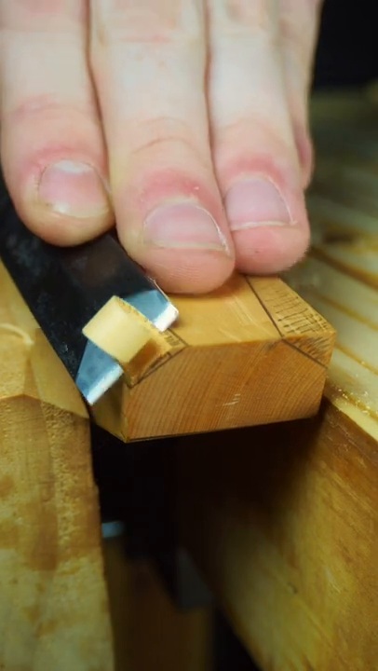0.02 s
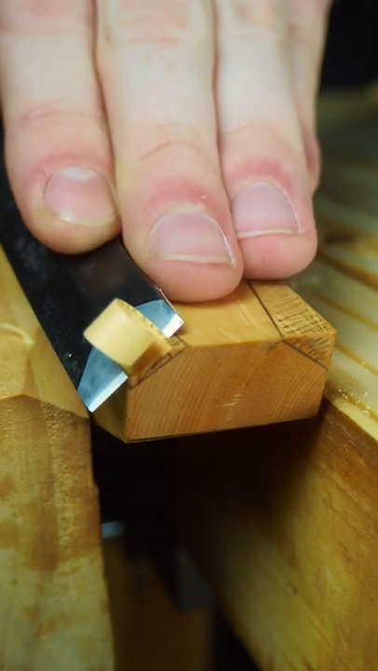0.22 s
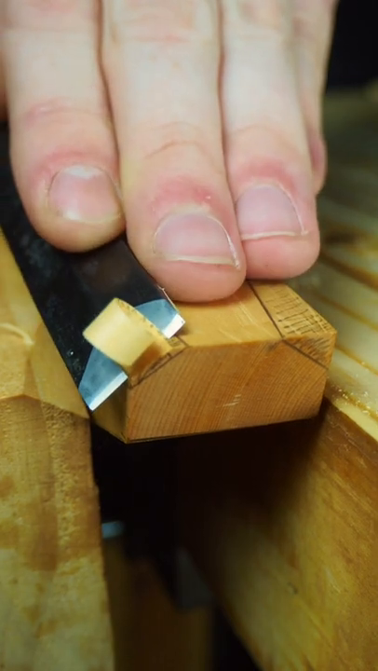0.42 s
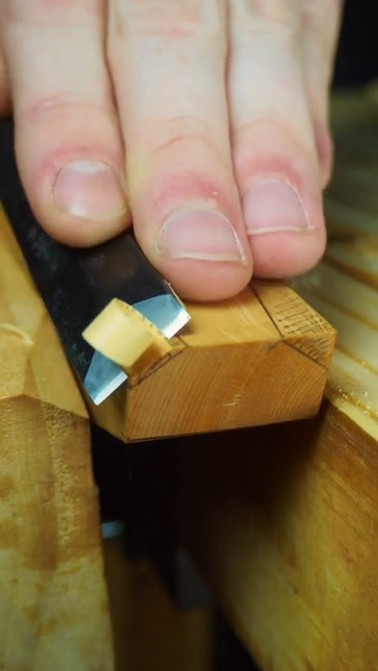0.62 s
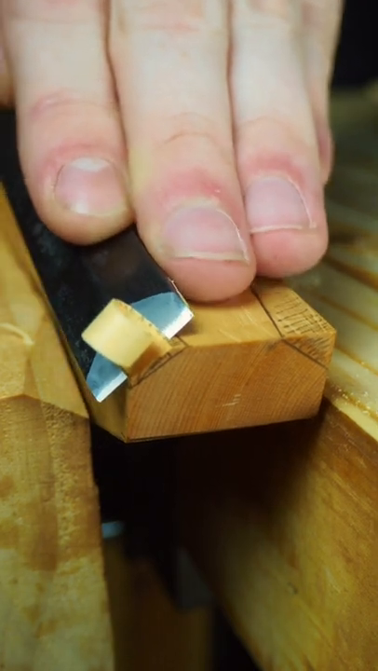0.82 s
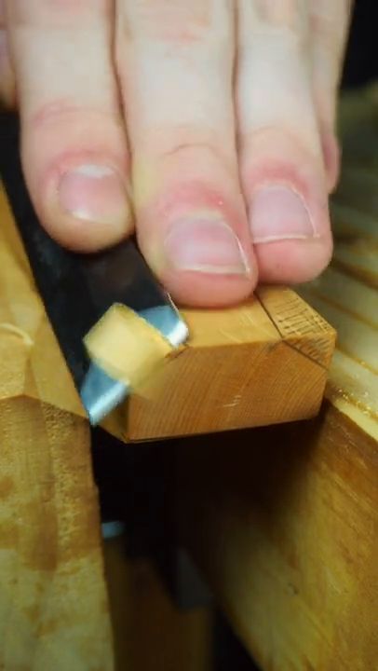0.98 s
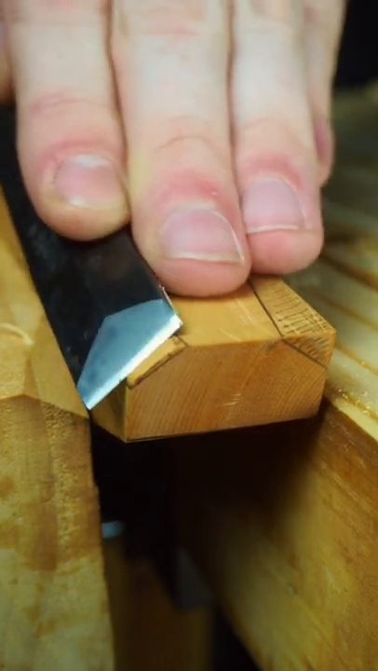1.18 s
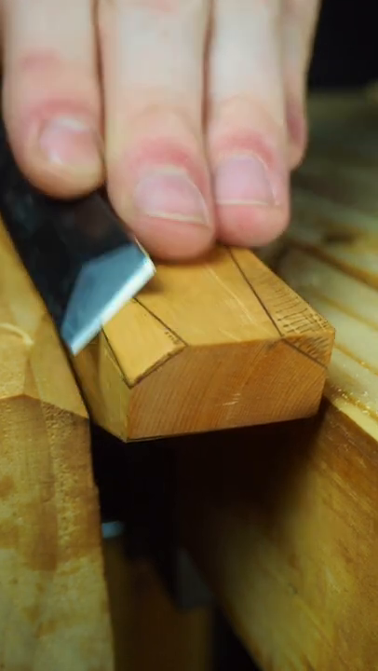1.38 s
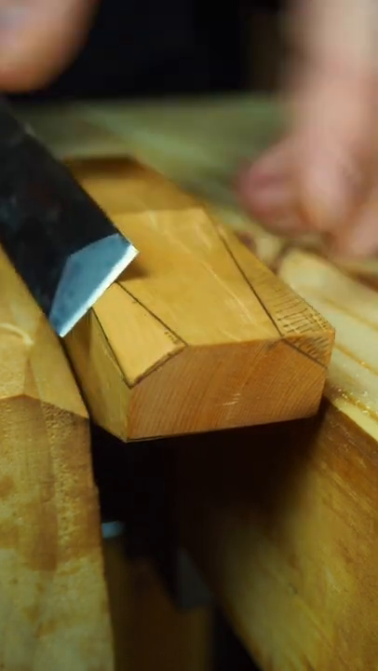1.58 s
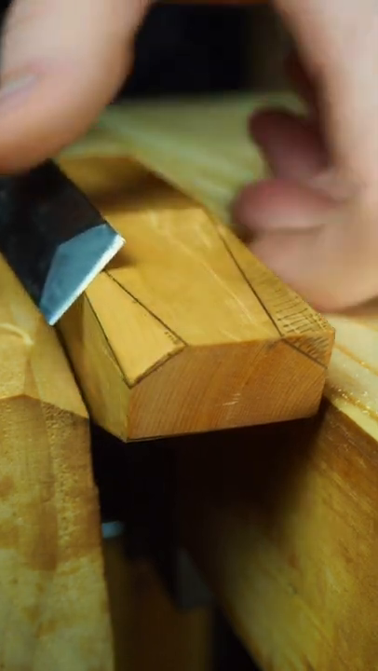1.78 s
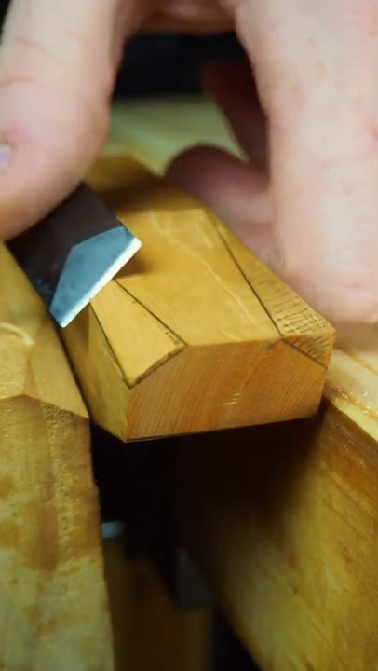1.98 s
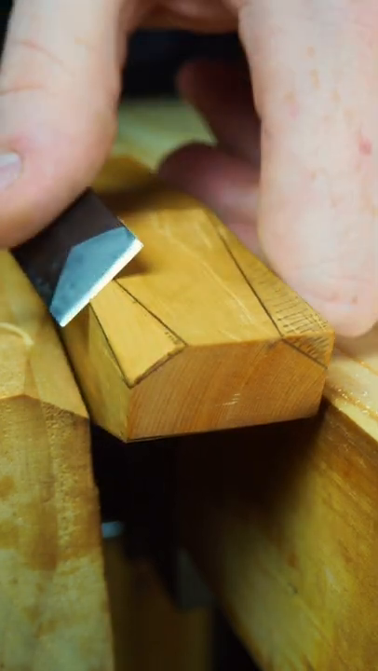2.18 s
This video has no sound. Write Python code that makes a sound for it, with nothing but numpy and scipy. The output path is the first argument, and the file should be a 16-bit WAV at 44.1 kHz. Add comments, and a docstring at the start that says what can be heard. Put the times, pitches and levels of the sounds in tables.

```python
"""Chisel on a wooden block

A chisel is pushed through the corner of a wooden block in four short nudges and one longer slice.
Each nudge scrapes by friction, then splitting fibres crack and the jolted block and bench ring as damped modes.
The shaving comes free with a clack, and the hands shift their grip as friction noise on wood.
Decaying noise makes the echoes of a small workshop; high sine bursts are a lens motor pinging on the right."""
import sys
import numpy as np
from scipy import signal
from scipy.fft import rfft, irfft
from scipy.io import wavfile
from scipy.ndimage import uniform_filter1d

SR = 44100
rng = np.random.default_rng(int(sys.argv[2]) if len(sys.argv) > 2 else 0)


def log_audio(samples):
    """Write samples as a 16-bit WAV file to the path given in sys.argv[1]."""
    # one column per channel
    frames = np.atleast_2d(samples).T
    # limit to full scale, then quantise
    limited = np.clip(frames, -1, 1)
    pcm = np.round(limited * 32767).astype(np.int16)
    wavfile.write(sys.argv[1], SR, pcm)


N = 97020
T = np.arange(N) / SR  # time, s
LOW_CUT_HZ = 188  # lowest frequency of the cracks and of the wood's ring

# jolts of the blade: [t/s, thud level/dB, crack level/dB, upper band edge of crack f/Hz, split pitch f/Hz]
JOLT_EVENTS = [(0.2098, -20, -22.5, 2000, 1280), (.249, -30.5, -39.5, 1500, 1200),
               (0.285, -62, -33.5, 5230, 4200), (0.4203, -22.5, -53, 1310, 1070),
               (0.441, -31.5, -29.5, 3200, 1580), (.462, -50, -29.5, 3500, 1080),
               (0.6212, -9, -13, 4800, 2377), (0.65, -29, -39, 4400, 3700), (.709, -23.5, -38, 2500, 1470),
               (.8145, -9, -22.5, 1500, 1140), (0.8176, -15, -15.5, 3600, 2050),
               (.873, -27, -39, 4000, 3600), (.9945, -28, -32.5, 2430, 2130), (1.051, -25, -26, 6050, 2300),
               (1.103, -24, -53, 2500, 1600), (1.133, -47, -23, 4600, 1836)]
# spectrum of tearing fibres: [f/Hz, gain/dB]
TEAR_SPECTRUM = [(100, -35), (400, -0.5), (700, 4), (950, 13), (1400, -1), (2200, 4), (2900, -31.5),
                 (4000, -14), (6000, -25.5), (15000, -48)]


def amp(db):
    """Level in decibels to amplitude ratio."""
    return 10 ** (np.asarray(db) / 20)


def unit(x):
    """Normalises the mean power: rms 1."""
    return x / np.sqrt(np.mean(x ** 2) + 1e-20)


def read(points, hz):
    """Interpolates a spectrum linearly along a logarithmic frequency axis."""
    f, value = np.transpose(points)
    return np.interp(np.log(hz + 1), np.log(f + 1), value)


def colour(x, db_at):
    """Minimum-phase filter: the Hilbert transform of the log gain (dB at each f) gives a causal phase."""
    log_gain = np.log(amp(db_at(abs(np.fft.fftfreq(8192, 1 / SR)))))
    response = np.exp(np.conj(signal.hilbert(log_gain)))
    taps = np.fft.ifft(response).real[:4096]
    return signal.oaconvolve(x, taps[None], axes=1)[:, :x.shape[1]]


def spread(pair):
    """Interchannel coherence: two unrelated signals are mixed to be alike in the bass, as at close microphones."""
    # left-right coherence: [f/Hz, likeness from 0 to 1]
    likeness = [(25, .5), (65, 0.93), (600, 0.9), (1400, 0.71), (3000, 0), (7000, 0), (15000, 0.32)]
    a, b = rfft(pair)
    hz = np.fft.rfftfreq(pair.shape[1], 1 / SR)
    turn = np.arccos(np.clip(read(likeness, hz), -1, 1)) / 2
    common, opposed = a * np.cos(turn), b * np.sin(turn)
    return irfft([common + opposed, common - opposed], pair.shape[1])


def noise(spectrum):
    """Stationary Gaussian stereo noise, shaped in the frequency domain to a given spectrum."""
    return unit(colour(spread(rng.standard_normal((2, N))), lambda f: read(spectrum, f)))


def fibres():
    """Friction as shot noise: dense random impulses of uneven size, one for each tiny snap."""
    rate_per_s, spread_db = 7000, 3.5
    size = amp(spread_db * np.minimum(rng.exponential(1, N), 4))
    size = size * (rng.random(N) < rate_per_s / SR)
    return spread(size * rng.standard_normal((2, N)))


def swells(rows):
    """Exponential growth to each peak and exponential decay after it."""
    return sum(amp(db) * np.exp(-np.maximum((s - T) / rise, (T - s) / fall)) for s, rise, fall, db in rows)


def add(mix, s, sound):
    """Superposition: adds a sound to the mix from time s on."""
    part = mix[..., round(s * SR):][..., :sound.shape[-1]]
    part += sound[..., :part.shape[-1]]


def catching():
    """Stick-slip: random gain of a surface that catches and slips."""
    rough_db, smooth_s = 3, .004
    wander = uniform_filter1d(rng.standard_normal(N), max(round(smooth_s * SR), 1))
    return unit(amp(rough_db * unit(wander)))


def room_air():
    """Background room noise: stationary noise under a slowly changing level."""
    # spectrum: [f/Hz, gain/dB]
    air_spectrum = [(15, -18), (25, -61), (87, 1.5), (180, 2), (206, 7.5), (236, -7.5), (309, 0),
                    (476, -2.5), (516, -2), (695, -6.5), (1160, -4), (2350, -11.5), (9320, -24.5),
                    (16000, -33)]
    # level of the noise: [t/s, level/dB]
    air_level = [(0, -51), (1.3, -50.5), (1.65, -54.5), (2.0, -57), (2.2, -57.5)]
    return noise(air_spectrum) * amp(np.interp(T, *np.transpose(air_level)))


def workshop(x, first_s=0.0085):
    """Reverberation: convolution with clumped decaying noise, the top treble dying fastest."""
    # reverberation time: [f/Hz, t60/s]
    room_t60 = [(100, 0.58), (350, 0.43), (1000, 0.57), (2500, .6), (5000, 0.3), (8000, 0.18), (15000, .12)]
    # echo strength: [f/Hz, level/dB]
    room_level = [(100, -3.5), (350, 1), (1000, -4), (2500, -5), (5000, -4.5), (8000, -12), (15000, -18)]
    lump_db, lump_s = 3.5, .011
    hz, t, z = signal.stft(spread(rng.standard_normal((2, SR))), SR, nperseg=256)
    # clumps: random level smoothed over frequency, then over time
    lumps = uniform_filter1d(rng.standard_normal(z.shape[1:]), size=6, axis=0)
    lumps = unit(uniform_filter1d(lumps, max(round(lump_s / t[1]), 1), axis=1))
    fade = amp(lump_db * lumps - 60 * t / read(room_t60, hz)[:, None])
    power = SR * np.mean(fade ** 2, 1, keepdims=True)
    fade *= amp(read(room_level, hz))[:, None] / np.sqrt(power)
    tail = signal.istft(z * fade, SR, nperseg=256)[1][:, :SR]
    # silent until first_s, full from twice that time
    tail = tail * np.clip(T[:SR] / first_s - 1, 0, 1)
    return signal.fftconvolve(x, tail, axes=1)[:, :N]


def lens_motor():
    """Tone bursts: very high sine pairs with a little noise, close to the right microphone."""
    # pings: [t/s, length/s, level/dB]
    pings = [(0.268, 0.014, -43), (0.322, 0.0084, -32), (0.352, 0.033, -47.5), (0.437, 0.013, -44),
             (0.482, 0.023, -40.5), (0.517, 0.05, -46.5), (0.683, 0.014, -46), (0.737, 0.027, -49),
             (0.776, 0.04, -48), (0.876, 0.014, -50), (0.927, 0.04, -44.5), (0.976, 0.026, -44.5),
             (1.03, .055, -50), (1.133, 0.015, -41.5), (1.185, 0.021, -39), (1.217, 0.028, -47)]
    # sine partials: [f/Hz, level/dB]
    partials = [(15010, 18.5), (15290, -19)]
    # spectrum of the fizz: [f/Hz, gain/dB]
    fizz_spectrum = [(9000, -68), (14000, -28), (14900, -8.5), (15400, -4), (15750, -1.5), (16000, -8.5)]
    rise_s, fall_s, left_db, fizz_db = .004, .011, -26, -3
    out, t = np.zeros(N), T[:SR // 5]
    fizz = amp(fizz_db) * noise(fizz_spectrum)[0]
    for s, length, db in pings:
        tone = unit(sum(amp(line_db) * np.sin(2 * np.pi * (hz * t + rng.random())) for hz, line_db in partials))
        shape = np.minimum(t / rise_s, 1) * np.exp(-np.maximum(t - length, 0) / fall_s)
        add(out, s, amp(db) * shape * (tone + fizz[round(s * SR):][:len(t)]))
    return out * amp([[left_db], [0]])


def hands():
    """Friction and sway: the bench rumbles under the push, the palm rubs it, fingertips brush the block."""
    # bench sways, palm rubs, finger brushes: [peak t/s, rise/s, fall/s, level/dB]
    sway_events = [(.255, 0.031, 0.025, -46), (.455, 0.039, 0.032, -38.5), (.68, 0.021, 0.13, -44),
                   (.93, 0.058, 0.031, -42), (1.06, 0.025, 0.028, -37.5), (1.172, 0.015, 0.016, -35),
                   (1.24, .02, 0.0099, -39.5)]
    rub_events = [(1.35, 0.028, 0.085, -51), (1.51, 0.032, 0.039, -57.5), (1.585, 0.032, 0.041, -58),
                  (1.68, .02, 0.18, -58.5), (1.98, 0.045, 0.027, -54.5)]
    brush_events = [(1.503, 0.0012, 0.0023, -63), (1.565, .015, 0.032, -60.5), (1.659, 0.0029, 0.015, -50),
                    (1.701, 0.0053, 0.0046, -46), (1.756, 0.0017, 0.0038, -51.5), (1.78, .02, 0.025, -65),
                    (1.89, 0.056, 0.051, -62.5)]
    # spectra of bench, palm and fingertips: [f/Hz, gain/dB]
    bench_spectrum = [(25, -24), (70, -44), (115, 7.5), (165, 10), (230, -11.5), (500, -56), (2000, -84)]
    palm_spectrum = [(60, -22), (200, -21), (500, 4), (680, -13), (920, 6.5), (1130, 5), (1400, -32),
                     (2300, -16), (6000, -24.5)]
    skin_spectrum = [(200, 13), (1500, 8), (4000, 8), (7200, 11.5), (10500, 12), (14000, 6), (16000, 0)]
    rubbing = noise(palm_spectrum) * swells(rub_events)
    brushing = unit(colour(fibres(), lambda f: read(skin_spectrum, f))) * swells(brush_events)
    rumble = noise(bench_spectrum) * swells(sway_events)
    return rumble + catching() * (rubbing + brushing)


def wood_ring():
    """Modal decay: one push on block and bench sums damped sines whose levels scatter from push to push."""
    # modes of block and bench: [f/Hz, level/dB, t60/s]
    modes = [(121.5, -23, 0.22), (155, -23.5, 0.36), (198.9, -24.5, 0.66), (293.3, -15.5, 0.13),
             (325.3, -3.5, 0.098), (347.1, -9, 0.12), (429.2, -5, 0.12), (456, -7, 0.12), (513, -3, 0.11),
             (566.6, -15, 0.08), (658.4, -23, 0.13), (920, -22, 0.1), (1161.4, -8.5, 0.046),
             (1415, -15, 0.028), (2213, -15, 0.022)]
    scatter_db, rise_s = 3, 0.0016
    t = T[:SR // 2]
    ring = 0
    for hz, db, t60 in modes:
        level_db = db + scatter_db * rng.standard_normal()
        ring = ring + amp(level_db - 60 * t / t60) * np.sin(2 * np.pi * hz * t)
    high_pass = signal.butter(2, LOW_CUT_HZ, "high", fs=SR, output="sos")
    return signal.sosfilt(high_pass, (1 - np.exp(-t / rise_s)) * ring)


def breakout():
    """Modal decay: the blade comes free and clacks against the wood as damped sines of random phase."""
    # modes of the clack: [f/Hz, level/dB, t60/s]
    clack_modes = [(886, 4, 0.068), (990, -3, 0.11), (1822, -7.5, 0.058), (2054, 4.5, 0.037),
                   (2250, -16, 0.14), (3700, -12, 0.065)]
    clack_s, clack_db, rise_s = 1.133, -24, 0.0013
    out, t = np.zeros((2, N)), T[:SR // 3]
    ring = 0
    for hz, db, t60 in clack_modes:
        phase = np.pi * rng.random((2, 1))  # one for each channel
        ring = ring + amp(db - 60 * t / t60) * np.sin(2 * np.pi * hz * t + phase)
    add(out, clack_s, amp(clack_db) * (1 - np.exp(-t / rise_s)) * ring)
    return out


def after_snaps():
    """Stress relaxation: sparse fibre snaps die away after each jolt, and each also nudges the block."""
    rate_per_s, fall_s, tick_db, knock_db = 130, 0.07, -20, -14.5
    stress = sum(amp(crack_db) * (T > s) * np.exp(-abs(T - s) / fall_s) for s, _, crack_db, _, _ in JOLT_EVENTS)
    snaps = spread(rng.standard_normal((2, N)) * (rng.random(N) < rate_per_s / SR))
    ticks = unit(colour(snaps, lambda f: read(TEAR_SPECTRUM, f)))
    knocks = unit(signal.oaconvolve(snaps.mean(0), wood_ring())[:N])
    return stress * (amp(tick_db) * ticks + amp(knock_db) * knocks)


def slides():
    """Resonance driven by friction: sliding before the jolts excites the narrow modes of the blade."""
    # slides: [peak t/s, rise/s, fall/s, level/dB]
    slide_events = [(.206, .016, 0.011, -32), (.333, 0.0043, 0.023, -45), (.414, 0.0058, 0.0055, -32),
                    (.546, 0.0079, 0.0079, -46.5), (.606, 0.011, 0.023, -46.5),
                    (.808, 0.0061, 0.014, -38.5), (.943, .01, 0.01, -50), (1.003, 0.0093, 0.038, -42)]
    # blade resonances: [f/Hz, bandwidth/Hz, level/dB]
    resonances = [(1113, 43, 12), (2200, 200, -2), (3400, 700, -8.5), (5130, 230, -6.5), (6700, 170, -11.5),
                  (9160, 170, -6.5), (10230, 170, -5.5), (14200, 1200, -25)]
    hiss_db = -25  # floor between the resonances

    def blade_db(f):
        """Sum of Lorentzian resonance curves in power."""
        peaks = sum(amp(db) ** 2 / (1 + (2 * (f - hz) / width) ** 2) for hz, width, db in resonances)
        return 10 * np.log10(amp(hiss_db) ** 2 + peaks)
    return unit(colour(fibres(), blade_db)) * swells(slide_events)


def last_slice():
    """Continuous fracture: random snaps drive the block's modes and tear, while the cutting edge hisses."""
    # course of the slice: [t/s, push on block level/dB, tearing level/dB, edge hiss level/dB]
    slice_course = [(.99, -75, -69, -69), (1.024, -26, -34, -40.5), (1.056, -23.5, -28.5, -30),
                    (1.073, -21.5, -34, -45.5), (1.098, -62, -43, -55), (1.148, -57, -46, -54),
                    (1.20, -55, -42.5, -70), (1.226, -59, -52, -86), (1.255, -81, -78, -88)]
    # spectrum of the edge hiss: [f/Hz, gain/dB]
    edge_spectrum = [(500, 10.5), (2500, 15.5), (4000, 8.5), (4700, -6), (5500, 5.5), (7500, -1), (9500, 6),
                     (11500, -3.5), (13700, 4.5), (16000, -10.5)]
    edge_left_db = -1  # the right channel gets the opposite
    s, *levels = np.transpose(slice_course)
    push, tearing, hiss = (amp(np.interp(T, s, db, left=-120, right=-120)) for db in levels)
    snaps = fibres()
    shudder = unit(signal.oaconvolve(snaps.mean(0), wood_ring())[:N])
    torn = unit(colour(snaps, lambda f: read(TEAR_SPECTRUM, f)))
    edge = unit(colour(fibres(), lambda f: read(edge_spectrum, f)))
    edge = edge * amp([[edge_left_db], [-edge_left_db]])
    return push * shudder + catching() * tearing * torn + hiss * edge


def jolts():
    """Brittle fracture and impact: fibres split with a short pitched crack, and the blade thuds into the block."""
    # spectrum of the crack: [f/Hz, gain/dB]
    crack_spectrum = [(60, -21), (200, -5), (450, -1.5), (720, -7.5), (1100, 4.5), (1700, 0.5),
                      (2300, -12.5), (3000, -9.5), (6000, -15.5), (15000, -34)]
    rise_s, fall_s, thud_lag_s = 0.0011, 0.0049, 0.001304
    split_width_hz, split_db = 93, -5.5
    out, grain, t = np.zeros((2, N)), noise(crack_spectrum), T[:SR // 10]
    burst = np.minimum(t / rise_s, 1) * np.exp(-t / fall_s)
    burst_rms = np.sqrt(np.mean(burst ** 2))
    for s, thud_db, crack_db, bright_hz, split_hz in JOLT_EVENTS:
        snap = grain[:, round(s * SR):][:, :len(t)] * burst
        band = signal.butter(2, [LOW_CUT_HZ, min(bright_hz, SR / 3)], "band", fs=SR)
        crack = signal.lfilter(*band, snap)
        split = signal.lfilter(*signal.iirpeak(split_hz, split_hz / split_width_hz, fs=SR), snap)
        both = unit(unit(crack) + amp(split_db) * unit(split))
        add(out, s, amp(crack_db) * both * burst_rms)
        add(out, s + thud_lag_s, amp(thud_db) * wood_ring())
    return out


def scene():
    """Superposition of work, echoes and air, with a small level and arrival-time difference between channels."""
    tilt_db, left_lag_s = 0.28, .00007  # left raised and right lowered by the tilt
    work = jolts() + after_snaps() + slides() + last_slice() + breakout() + hands()
    left, right = (work + workshop(work) + room_air()) * amp([[tilt_db], [-tilt_db]])
    left = np.pad(left, (round(left_lag_s * SR), 0))[:N]
    return np.array([left, right]) + lens_motor()


def record(dry):
    """Downward expansion: a mild noise suppressor turns quiet passages down; then a steep low-pass."""
    quiet_db, knee_db, duck_db = -29.5, 7, 5  # threshold, range below it to full depth, depth
    detect_s, cut_hz = 0.016, 16000
    power = uniform_filter1d((dry ** 2).mean(0), max(round(detect_s * SR), 1))
    level_db = 10 * np.log10(abs(power) + 1e-12)
    ducked = dry * amp(-duck_db * np.clip((quiet_db - level_db) / knee_db, 0, 1))
    low_pass = signal.firwin(511, cut_hz, window=("kaiser", 9), fs=SR)
    return signal.oaconvolve(ducked, low_pass[None], "same")


dry = scene()
out = record(dry)
log_audio(out)
```